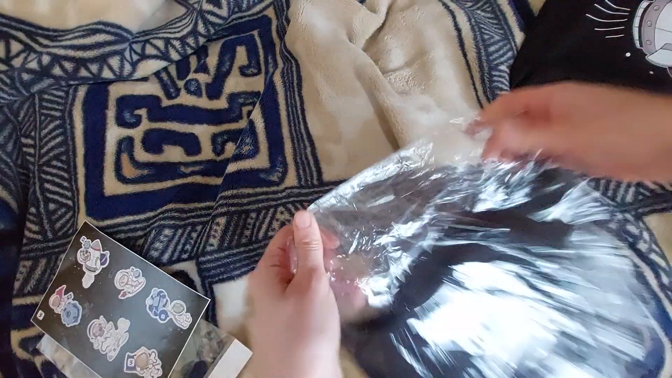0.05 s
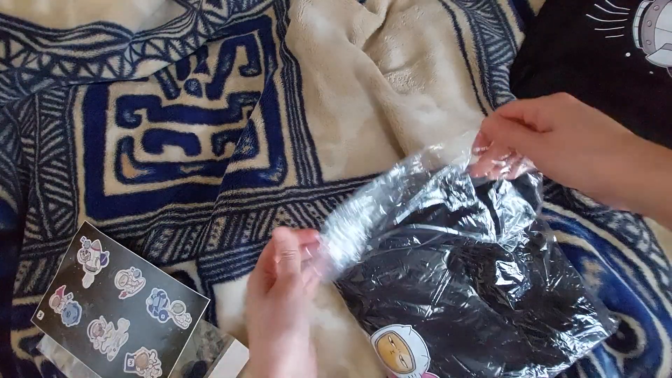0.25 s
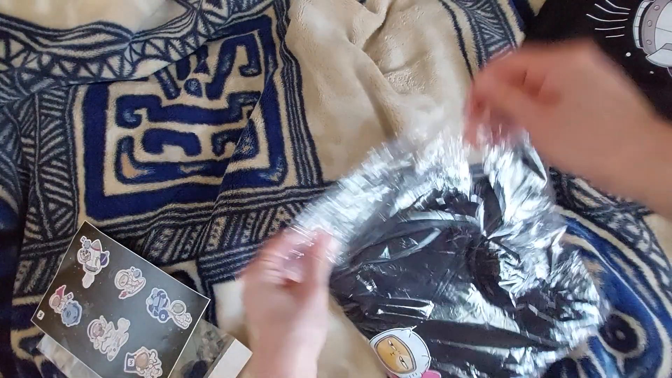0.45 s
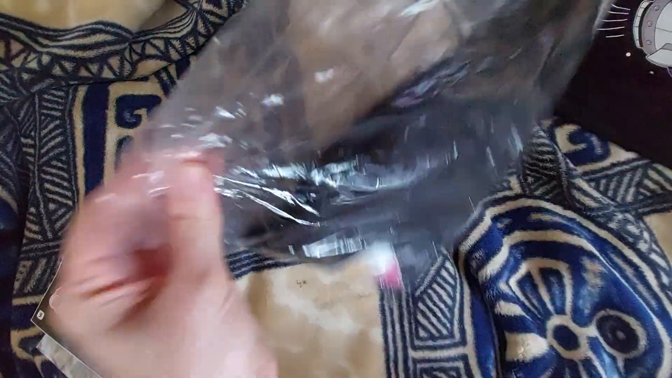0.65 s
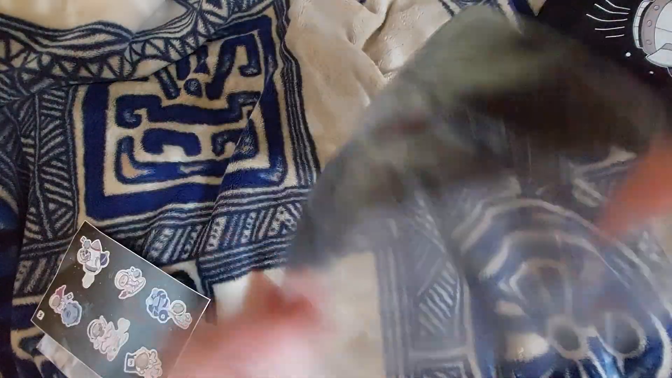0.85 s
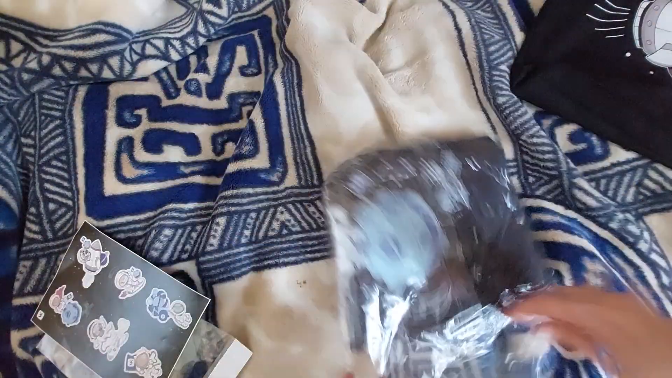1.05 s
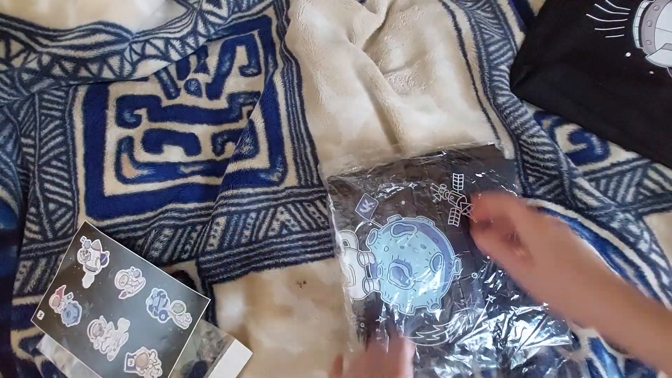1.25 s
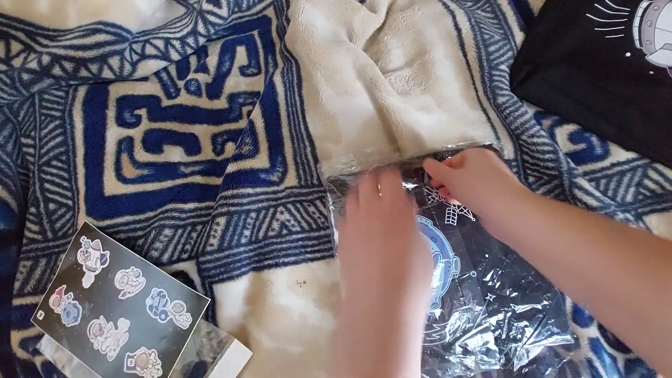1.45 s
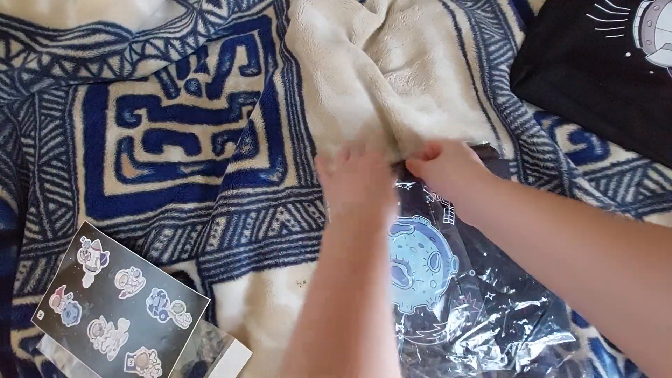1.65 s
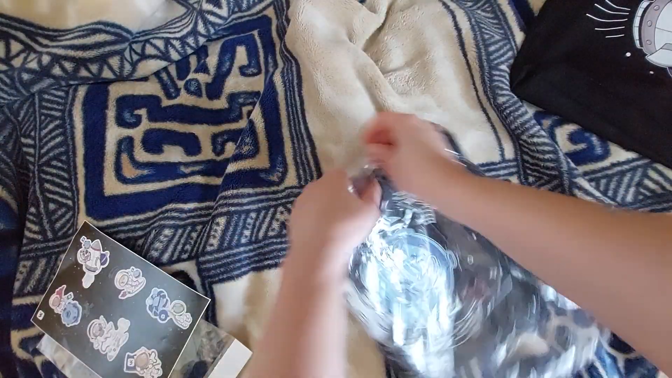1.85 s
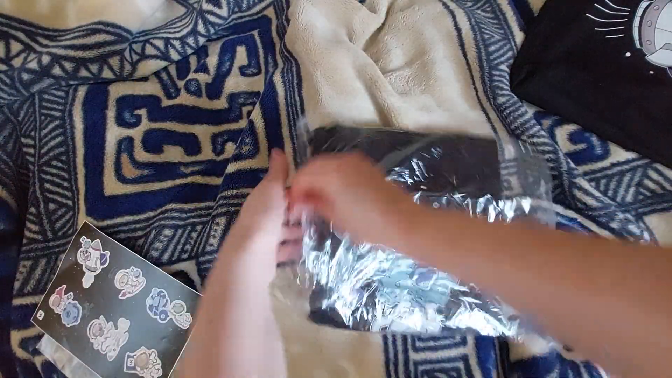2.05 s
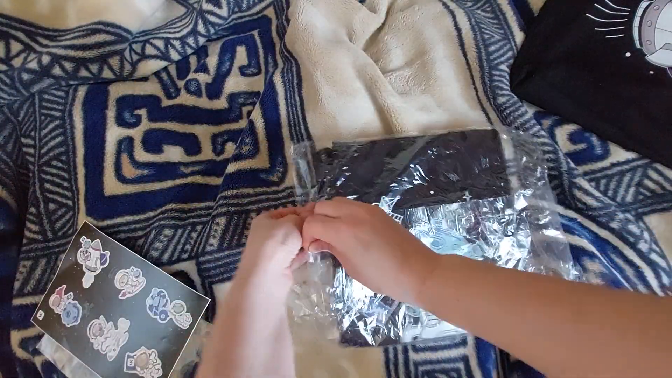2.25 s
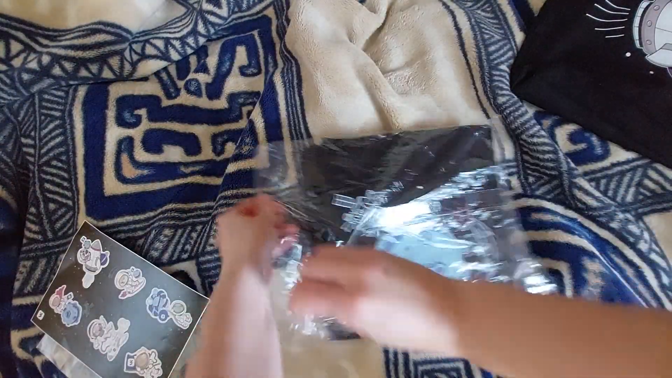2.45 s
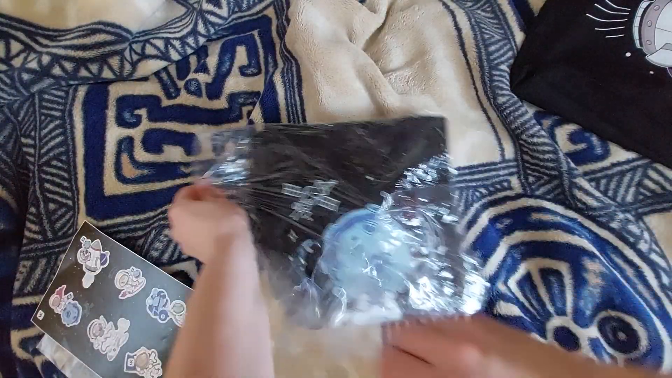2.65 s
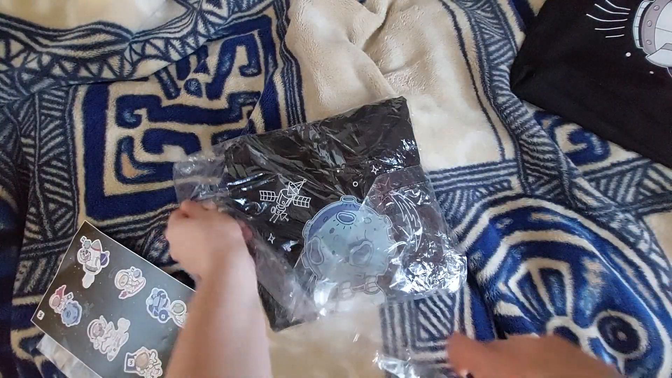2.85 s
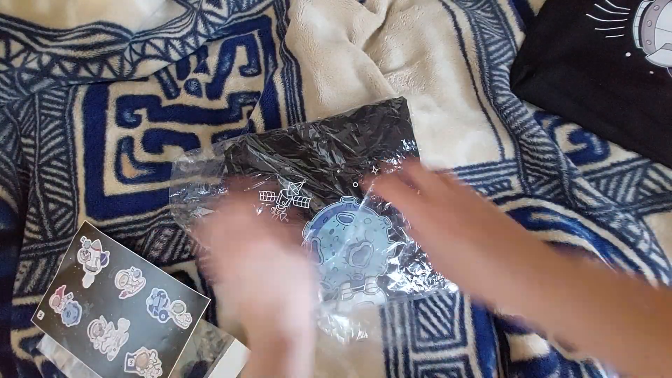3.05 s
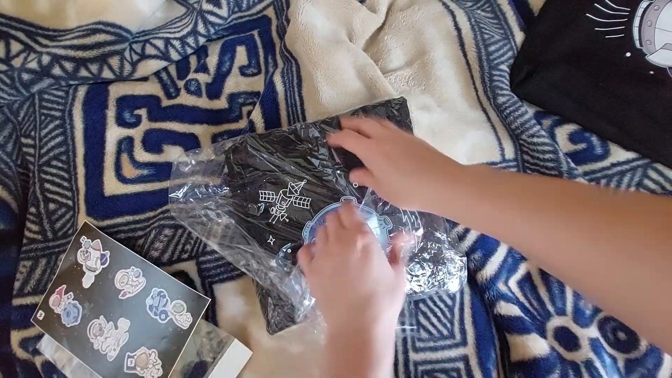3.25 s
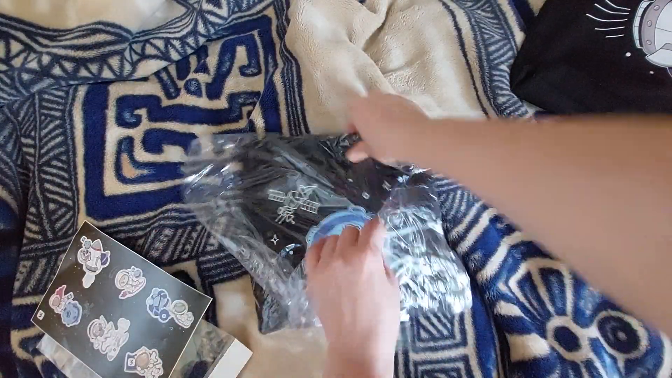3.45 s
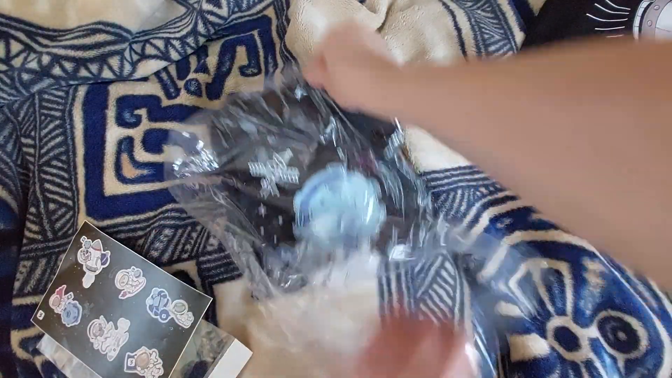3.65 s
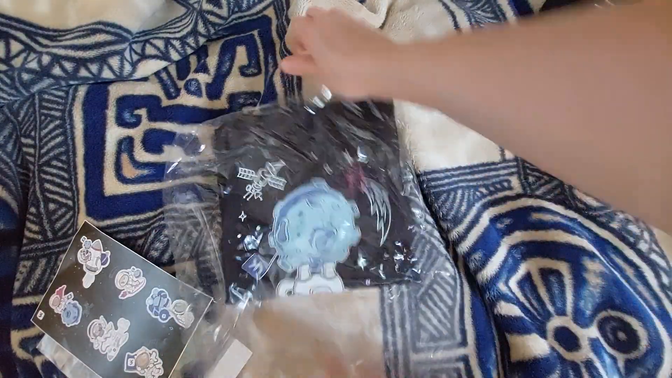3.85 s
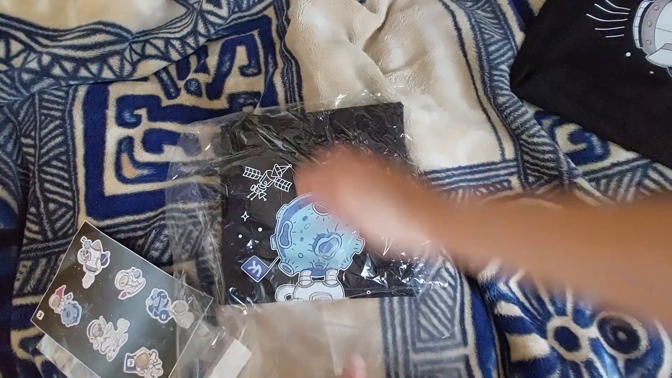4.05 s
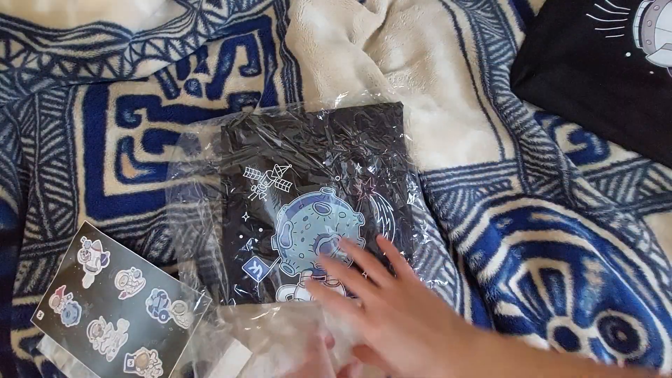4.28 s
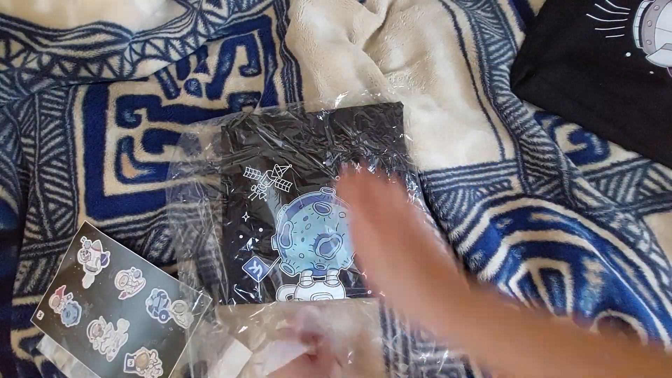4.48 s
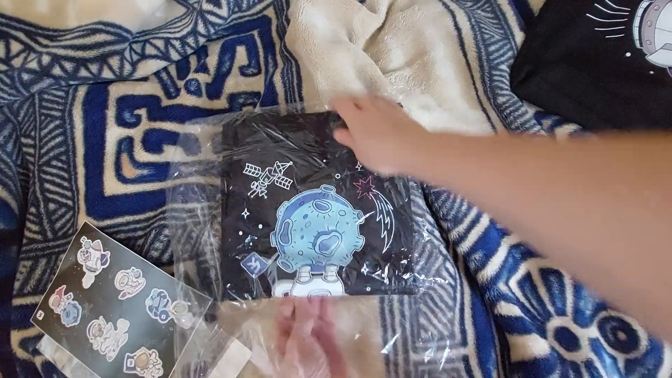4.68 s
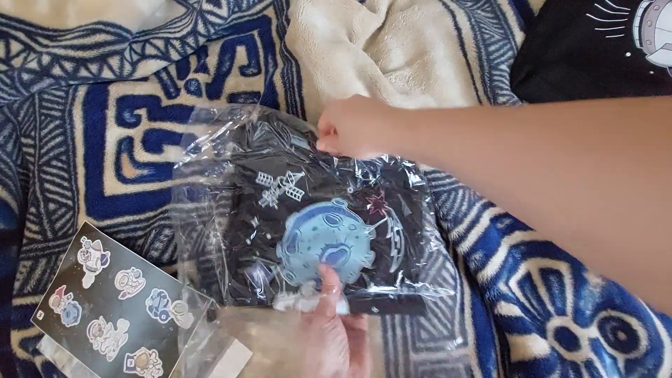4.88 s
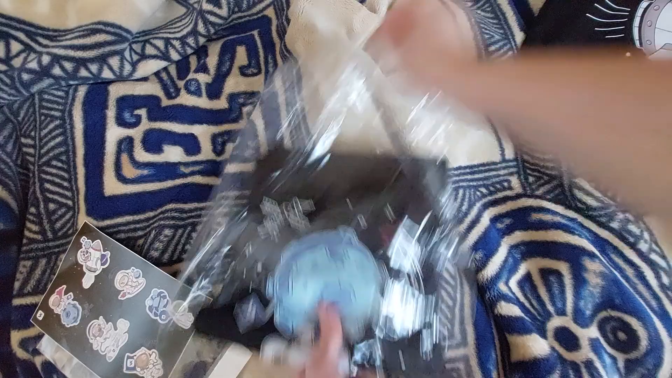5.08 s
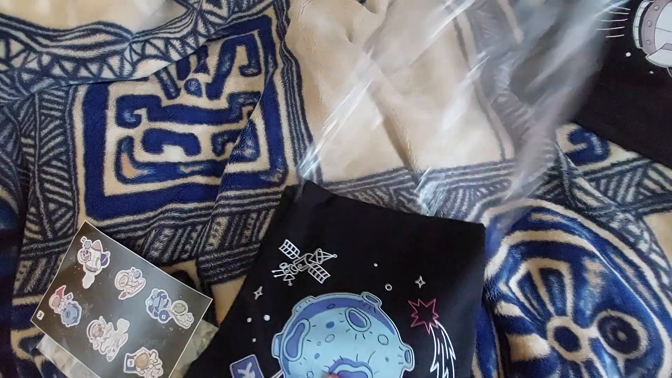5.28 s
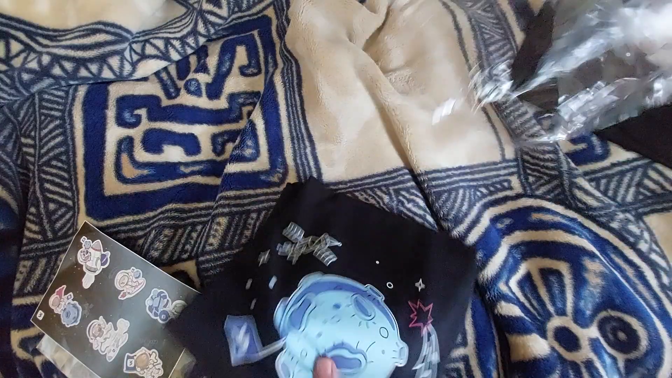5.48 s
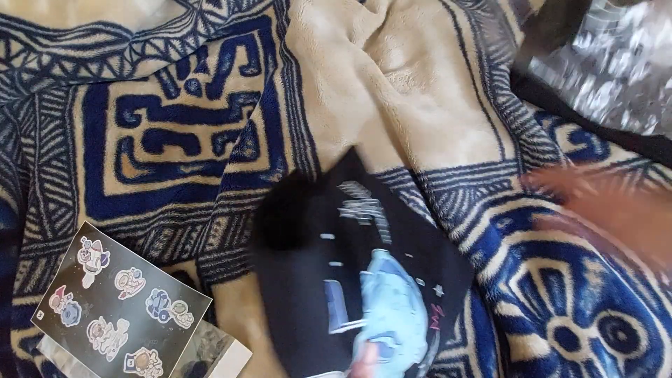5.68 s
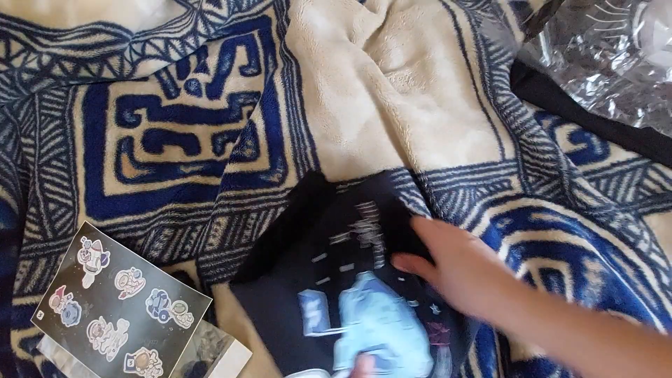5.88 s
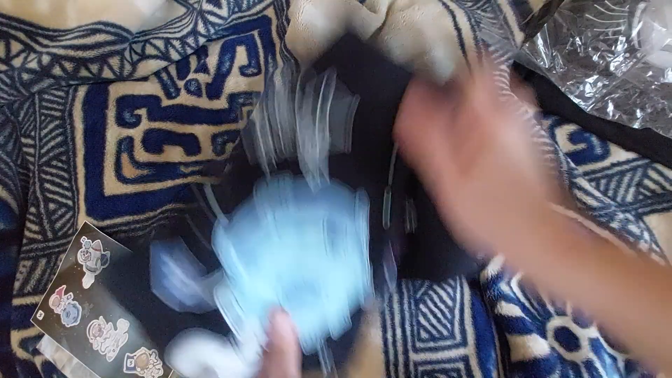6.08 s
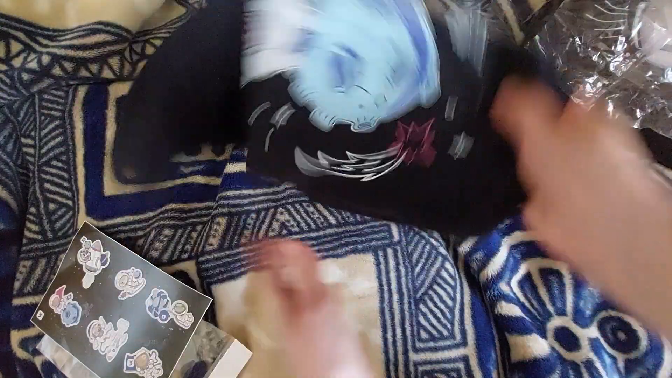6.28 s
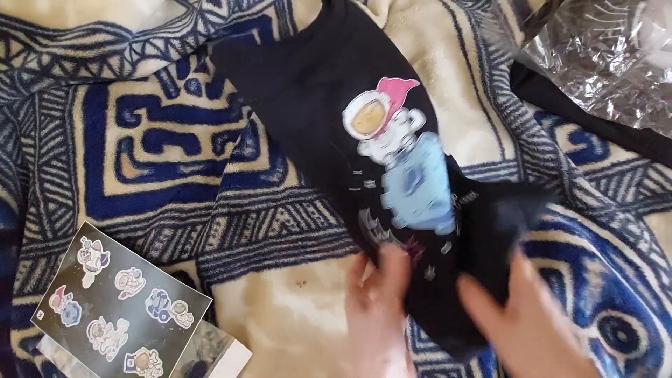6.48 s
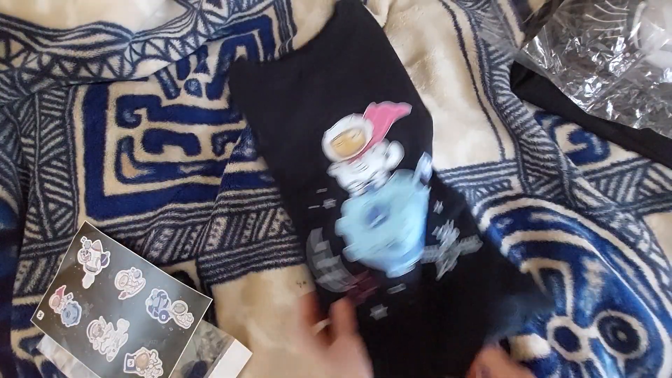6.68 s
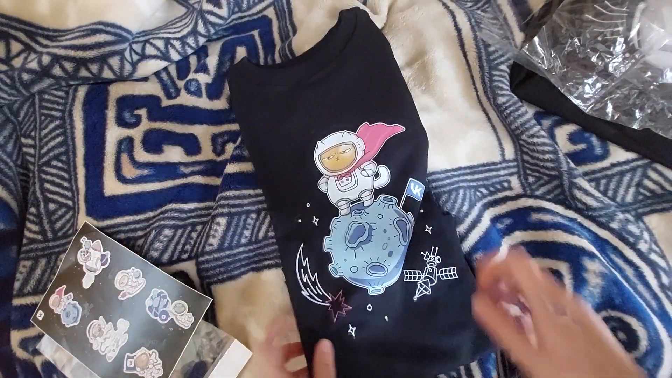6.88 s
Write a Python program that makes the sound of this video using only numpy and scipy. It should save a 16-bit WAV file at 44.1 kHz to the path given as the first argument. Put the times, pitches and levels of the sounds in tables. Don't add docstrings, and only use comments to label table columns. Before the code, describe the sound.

Hands turn, tear open and empty a crinkly plastic bag in a small quiet bedroom, sharp snaps over muffled low bumps.

```python
import sys
import numpy as np
from scipy import signal
from scipy.io import wavfile
from scipy.ndimage import uniform_filter1d

SR = 44100
rng = np.random.default_rng(int(sys.argv[2]) if len(sys.argv) > 2 else 0)


def inscribe(sig):
    pcm = np.round(np.clip(np.atleast_2d(sig).T, -1, 1) * 32767)
    wavfile.write(sys.argv[1], SR, pcm.astype(np.int16))


def natural_amplitude(level_db):
    exponent = np.asarray(level_db, float) / 20
    return 10 ** exponent


N = 305613
TIME = np.arange(N) / SR
LEFT_LAG_S = .00017
SNAP_LATE_S = .0008


def evened(x):
    return x / np.sqrt(np.mean(x ** 2) + 1e-20)


def steadied(x, s):
    power = abs(uniform_filter1d((x ** 2).mean(0), round(s * SR)))
    return x / np.sqrt(power + 1e-12)


def read(points, hz):
    f, value = np.transpose(points)
    return np.interp(np.log(hz + 1), np.log(f + 1), value)


def colour(x, points):
    hz = abs(np.fft.fftfreq(4096, 1 / SR))
    log_gain = np.log(natural_amplitude(np.maximum(read(points, hz), -80)))
    taps = np.fft.ifft(np.exp(signal.hilbert(log_gain).conj())).real[:2048]
    return signal.oaconvolve(x, taps[None], axes=1)[:, :N]


def resonate(x, hz, width):
    r = np.exp(-np.pi * width / SR)
    turn = 2 * np.pi * min(hz, 16000) / SR
    return signal.lfilter([1 - r, 0, r - 1], [1, -2 * r * np.cos(turn), r * r], x)


def treble(x):
    return signal.sosfilt(signal.butter(2, 9000, "high", fs=SR, output="sos"), x)


def panned(x, pan_db):
    return x * natural_amplitude(np.array([pan_db / 2, -pan_db / 2]).reshape(2, -1))


def swells(rows, shift_db=0):
    s, db, rise_s, fall_s = np.array(rows).T[:4, :, None]
    since = TIME[::64] - s
    drop_db = 20 * np.maximum(-since / abs(rise_s), since / abs(fall_s))
    level_db = db + np.reshape(shift_db, (-1, 1)) - drop_db
    return np.interp(TIME, TIME[::64], np.sqrt((natural_amplitude(level_db) ** 2).sum(0)))


# f/Hz, level per Hz/dB
HUM = [(18, -50.5), (30, -19), (53, -0.5), (124, -9.5), (189, -18.5), (295, -2.5), (649, -36), (844, -33.5),
       (2170, -38), (16000, -33)]


def hum():
    noise = .8 * rng.standard_normal(N) + rng.standard_normal((2, N))
    return natural_amplitude(-70) * evened(colour(noise, HUM))


# f/Hz, time to fall 60 dB/s
ROOM = [(250, 0.099), (1500, 0.17), (5000, 0.092), (13000, 0.017)]


def room(x):
    length = SR // 4
    echoes = np.zeros((2, length))
    at = np.arange(130, length - 20, 20) + rng.integers(0, 20, (2, (length - 131) // 20))
    np.put_along_axis(echoes, at, rng.choice([-1., 1.], at.shape), 1)
    hz, t, bands = signal.stft(echoes, SR, nperseg=128)
    t60 = np.maximum(read(ROOM, hz), .01)[:, None]
    tail = signal.istft(bands * natural_amplitude(-60 * t / t60), SR, nperseg=128)[1]
    return signal.fftconvolve(x, tail / np.linalg.norm(tail[0]), axes=1)[:, :N]


# t/s of the peak, crackle level/dB, rise/s per 20 dB, fall/s per 20 dB, pumped air over crackle/dB
HAND_STROKES = [(0.037, -32.0, 0.734, 0.08, -8), (0.156, -22.0, 0.081, 0.221, -11),
                (0.393, -39.5, 0.047, 0.024, -6), (0.491, -32.5, 0.13, 0.095, -9),
                (0.561, -30.0, 0.106, 0.048, -10), (0.614, -30.5, 0.097, 0.037, -12),
                (0.817, -30.5, 0.214, 0.284, -10), (1.119, -28.0, 0.434, 0.144, -9),
                (1.329, -47.5, 1.2, 0.015, -14), (1.409, -48.5, 0.05, 1.199, -10),
                (1.54, -45.5, 0.155, 0.023, -11), (1.579, -38.0, 0.015, 0.381, -16),
                (1.719, -36.0, 0.056, 0.59, -9), (1.893, -30.5, 0.124, 0.249, -13),
                (2.072, -33.5, 0.073, 0.167, -10), (2.16, -37.0, 0.45, 0.429, -9),
                (2.287, -24.0, 0.053, 0.015, -22), (2.377, -17.0, 0.122, 0.368, -14),
           (2.52, -31.0, 0.016, 0.026, -21), (2.592, -23.5, 0.091, 0.037, -22),
           (2.702, -17.5, 0.311, 0.131, -16), (2.923, -41.0, 1.001, 0.084, -8),
           (3.096, -49.0, 0.349, 0.042, -9), (3.217, -42.5, 0.036, 0.17, -18),
           (3.35, -36.0, 0.094, 0.15, -14), (3.562, -17.5, 0.078, 0.072, -17),
           (3.646, -22.5, 0.207, 0.018, -14), (3.723, -32.5, 0.173, 0.227, -10),
           (3.844, -34.5, 0.058, 0.17, -12), (3.943, -39.0, 0.105, 0.107, -6),
           (4.113, -52.0, 0.026, 0.106, -8), (4.193, -42.5, 0.015, 0.077, -10),
           (4.246, -38.0, 0.044, 0.18, -10), (4.457, -53.5, 0.015, 0.028, -13),
           (4.548, -50.0, 0.066, 0.061, -7),
                (4.713, -35.5, 0.064, 0.392, -11), (4.888, -30.0, 0.127, 0.125, -11),
           (5.072, -29.0, 0.194, 0.235, -9), (5.191, -26.5, 0.246, 0.192, -9),
           (5.34, -30.5, 0.317, 0.075, -11), (5.49, -35.5, 0.055, 0.174, -11),
           (5.668, -45.0, 0.03, 0.081, -15), (5.805, -42.0, 0.064, 0.096, -16),
           (5.932, -60.5, 0.362, 0.118, -3), (6.023, -61.0, 0.015, 0.077, -16),
           (6.172, -49.5, 0.077, 0.056, -9), (6.297, -77.5, 0.045, 0.036, 17),
           (6.544, -68.0, 0.181, 0.055, 10), (6.68, -64.0, 1.2, 0.265, -7)]
STROKES = HAND_STROKES


def pumped():
    return swells(STROKES, [row[4] for row in STROKES])


# t/s of the peak, level/dB, rise/s per 20 dB, fall/s per 20 dB
THUMPS = [(0.151, -41.5, 0.127, 0.157), (0.295, -51.5, 0.055, 0.256), (0.533, -43.0, 0.121, 0.131),
          (0.716, -48.5, 0.055, 0.155), (0.822, -46.5, 0.092, 0.352), (1.103, -40.5, 0.042, 0.082),
          (1.299, -65.0, 0.096, 0.472), (1.691, -60.5, 0.137, 0.652), (1.893, -55.5, 0.061, 0.707),
          (2.453, -40.5, 0.143, 0.276), (2.833, -53.5, 0.9, 0.2), (3.529, -49.0, 0.03, 0.319),
          (3.649, -47.5, 0.094, 0.193), (3.959, -52.5, 0.489, 0.108), (4.244, -57.5, 0.104, 0.239),
          (5.196, -45.5, 0.331, 0.256), (5.463, -54.0, 0.033, 0.209), (5.718, -66.0, 0.193, 0.129),
          (5.875, -58.5, 0.115, 0.074), (6.161, -52.5, 0.076, 0.047), (6.311, -62.0, 0.657, 0.05),
          (6.504, -48.0, 0.101, 0.097)]
# f/Hz, level per Hz/dB
RUMBLE = [(12, -44), (20, -24), (70, 0), (150, -2), (178, -14), (200, -2), (260, -27.5), (440, -120)]


def rumble():
    noise = rng.standard_normal(N) + 0.67 * rng.standard_normal((2, N))
    lumps = natural_amplitude(3.6 * evened(uniform_filter1d(rng.standard_normal(N), 1500)))
    low = steadied(colour(noise * lumps, RUMBLE), 0.11)
    level = np.hypot(swells(THUMPS), natural_amplitude(-14) * pumped())
    return panned(natural_amplitude(-1.35) * level * low, -3)


# f/Hz, width/Hz, level/dB
POCKET = [(285, 168, 7), (383, 332, 5), (710, 270, -2.5)]


def pocket(train, level):
    push = evened(train * rng.choice([-1, 1], N)) + 0.47 * rng.standard_normal(N)
    push = push + 0.29 * rng.standard_normal((2, N))
    push[0] = np.roll(push[0], round(LEFT_LAG_S * SR))
    air = np.zeros((2, N))
    for hz, width, db in POCKET:
        wide = width * 1.97
        air += natural_amplitude(db) * resonate(resonate(push, hz, wide), hz, wide)
    jolts = (uniform_filter1d(level, 300) / uniform_filter1d(level, 3000)) ** 0.45
    return natural_amplitude(-0.02) * pumped() * jolts * steadied(air, 0.056)


# t/s, left-right balance/dB, treble of the tight film/dB, body from cloth/dB
PLACE = [(0.0, -5, 0, 0), (0.3, -5, 0, -5), (0.6, -5.5, 2.5, -2), (1.3, -4, 0.5, -2), (2.1, -3.5, -1.5, 0),
         (2.3, -2, -1, -2), (2.43, -2, 2, 0), (2.72, -4, 4, 1), (3.0, 3, -7, 2), (3.5, -3.5, 1, -2),
         (4.1, -1.5, -1.5, 0), (4.6, -2.5, 2.5, 3), (5.3, -2, -1, 2), (5.5, -3.5, -5, -6),
         (5.8, -5.5, -4, -5), (6.1, -6, 2, -2), (6.5, -6, -3, -3), (6.93, -1, -1.5, 4)]


def follow(column):
    rows = np.array(PLACE)
    return np.interp(TIME, rows[:, 0], rows[:, column])


def bodied(x):
    body = signal.sosfilt(signal.butter(1, [550, 1500], "band", fs=SR, output="sos"), x)
    return x + (natural_amplitude(follow(column=3)) - 1) * body


def placed(x):
    lag_s_per_db = .00006
    late = np.round((-follow(column=1) * lag_s_per_db - LEFT_LAG_S) * SR).astype(int)
    left = x[0, np.clip(np.arange(N) - late, 0, N - 1)]
    return np.array([left, x[1]])


def crease(hz, ring_db, lag_s, crack_s, shiver_s, shiver_db, same):
    t = np.arange(900) / SR
    noise = rng.standard_normal((3, len(t)))
    same = np.clip(same, 0, 1)
    noise = same * noise[0] + np.sqrt(1 - same ** 2) * noise[1:]
    fade = np.exp(-t / crack_s) + natural_amplitude(shiver_db) * np.exp(-t / shiver_s)
    burst = noise * fade * (1 - np.exp(-t / .00008))
    burst = evened(burst) + natural_amplitude(ring_db) * evened(resonate(burst, hz, 0.11 * hz))
    late = max(round(lag_s * SR), 0)
    burst[0] = np.concatenate([np.zeros(late), burst[0, :len(t) - late]])
    return burst


def slips(per_s, spread_db, clump_db):
    clumps = evened(uniform_filter1d(rng.standard_normal(N), 500))
    size_db = spread_db * np.minimum(rng.exponential(1, N), 5) + clump_db * clumps
    return natural_amplitude(size_db) * (rng.random(N) < per_s / SR)


# f/Hz, level per Hz/dB
FILM = [(400, -25.5), (900, -7), (1300, -5), (1700, -2.5), (2600, -1), (4300, 0), (8800, -2.5),
        (12500, -0.5), (16500, -3)]


def crackle(train, level, count=24):
    patch = rng.integers(0, count, N)
    out = np.zeros((2, N))
    for k, hz in enumerate(np.geomspace(1000, 15000, count)):
        lag_s = LEFT_LAG_S * rng.uniform(.5, 1.5)
        grain = crease(hz, -4.3, lag_s, crack_s=.00028, shiver_s=.0026, shiver_db=-12.5, same=.7)
        grain = grain * natural_amplitude(rng.normal(0, 0.5, (2, 1)))
        out += signal.oaconvolve((train * (patch == k))[None], grain, axes=1)[:, :N]
    out = steadied(colour(out, FILM), 0.017)
    film = out + (natural_amplitude(follow(column=2)) - 1) * treble(out)
    return level * steadied(film, 0.032)


# t/s, peak level/dB, panel pitch f/Hz, run of slips after it relative to the snap/dB
CREASE_SNAPS = [(0.012, -19.5, 7560, -9), (0.0308, -18, 2600, -12), (0.1664, -16, 2690, -14),
                (0.1883, -10.5, 4140, -17.5), (0.2867, -17.5, 7300, -17), (0.3154, -19, 12200, -14),
                (0.3564, -24.5, 12500, -14), (0.609, -7.5, 14000, -27.5), (0.6462, -22, 7260, -17),
                (0.7418, -19, 4840, -11), (0.817, -19, 12400, -14), (0.8555, -20, 6630, -10),
                (0.913, -21, 4100, -10), (0.9484, -18.5, 7100, -10.5), (0.9852, -20.5, 5280, -11),
                (1.0162, -19.5, 7750, -14), (1.047, -20.5, 10700, -14), (1.1334, -15.5, 4120, -13.5),
                (1.2431, -27, 7460, -10), (1.4584, -30.5, 7670, -15), (1.5783, -22, 7600, -27),
                (1.658, -24, 3950, -15.5), (1.774, -20, 4680, -15), (1.8396, -19, 12900, -16),
                (1.905, -10.5, 13800, -17), (2.0814, -20.5, 4790, -12), (2.153, -18, 12300, -13),
                (2.255, -16, 1330, -13), (2.281, -12, 13800, -11), (2.288, -14, 11400, -10),
              (2.316, -13, 13800, -9), (2.325, -6.5, 10400, -12), (2.335, -14, 1720, -9.5),
              (2.353, -11, 902, -11), (2.357, -1, 1390, -12.5), (2.374, -6.5, 12100, -13),
              (2.38, -6, 4280, -7.5), (2.393, -6, 14400, -12.5), (2.405, -6, 3320, -10),
              (2.415, -6.5, 4340, -10.5), (2.441, -9, 5450, -10.5), (2.454, -5.5, 6760, -9.5),
              (2.464, -8.5, 1590, -10), (2.473, -8.5, 1220, -11), (2.497, -10, 1780, -9.5),
              (2.51, -5, 1700, -11.5), (2.59, -8, 6160, -11), (2.749, -12, 7360, -11.5),
              (2.924, -28, 2790, -10),
                (3.0799, -32.5, 4140, -16), (3.2226, -27, 3110, -15), (3.2363, -27.5, 11800, -14.5),
              (3.35, -15.5, 6540, -16), (3.4986, -9.5, 13100, -21.5), (3.5314, -7, 7150, -9),
              (3.5376, -12, 4400, -15), (3.5572, -6, 5400, -16), (3.5934, -10, 4340, -16),
              (3.6062, -17, 3450, -16), (3.6264, -8.5, 7190, -16), (3.6387, -7, 4160, -20),
              (3.688, -23.5, 7530, -9), (3.8145, -22.5, 5070, -11), (3.8425, -19, 12500, -16),
              (3.948, -18.5, 4250, -15), (4.0052, -28, 3730, -17), (4.058, -38, 7310, -17),
              (4.0921, -42, 4900, -16), (4.114, -30.5, 2190, -17.5), (4.196, -27.5, 5030, -20),
              (4.237, -21, 4900, -17), (4.318, -28.5, 5330, -11), (4.4523, -27.5, 7540, -15),
              (4.5231, -35.5, 2040, -18), (4.5506, -35, 3430, -16),
                (4.6608, -30.5, 13600, -14.5), (4.688, -29.5, 5070, -14.5), (4.694, -25, 12100, -14.5),
              (4.7152, -22.5, 12800, -14.5), (4.7215, -24, 12700, -14.5), (4.7466, -22, 5780, -14.5),
              (4.7734, -23, 11900, -14.5), (4.8214, -16, 7440, -14.5), (4.8813, -12, 8640, -14.5),
              (4.9326, -18, 5000, -14.5), (4.9412, -14, 12100, -14.5), (5.005, -16, 4740, -14.5),
              (5.1213, -16.5, 4460, -14.5), (5.1884, -13.5, 4640, -14.5), (5.2826, -15.5, 8880, -14.5),
              (5.37, -21.5, 11200, -14.5), (5.4475, -31, 7710, -14.5), (5.4654, -26, 4760, -14.5),
              (5.5525, -26, 4810, -14.5), (5.656, -36.5, 5540, -14.5), (5.7903, -31.5, 11600, -14.5),
              (5.9406, -42, 5900, -14.5), (6.0232, -37, 7400, -14.5)]
CREASES = CREASE_SNAPS


def snaps():
    out = np.zeros((2, N + 900))
    for s, db, hz, _ in CREASES:
        crack = crease(hz, -10, LEFT_LAG_S, crack_s=.00025, shiver_s=.0018, shiver_db=-16, same=.8)
        pop = resonate(crack, 730, 1100)
        crack = signal.lfilter(*signal.butter(2, min(5500, .55 * hz), "high", fs=SR), crack)
        pop_gain = natural_amplitude(-6 - 4.5 * np.log2(hz / 1300))
        sound = crack / abs(crack).max() + pop_gain * pop / abs(pop).max()
        at = round((s + SNAP_LATE_S) * SR)
        out[:, at:at + 900] += natural_amplitude(db + 3) * sound
    return out[:, :N]


def effort():
    level = natural_amplitude(-1.0) * swells(STROKES)
    run_s, hush_s, hush_db = .0078, .007, -3.5
    t = np.arange(round((run_s + .01) * SR)) / SR
    run = natural_amplitude(-1.8 * t / run_s - 60 * np.maximum(t - run_s, 0) / .012)
    hush = natural_amplitude(hush_db * np.sqrt(np.linspace(0, 1, round(hush_s * SR))))
    starts = [round((row[0] + SNAP_LATE_S) * SR) for row in CREASES]
    for at in starts:
        level[at - len(hush):at] *= hush
    for at, (_, db, _, run_db) in zip(starts, CREASES):
        part = level[at:][:len(t)]
        part[:] = np.maximum(part, natural_amplitude(db + run_db) * run)
    return level + 1e-6


def scene():
    train = slips(per_s=2500, spread_db=2.8, clump_db=3.0)
    level = effort()
    film = panned(crackle(train, level) + snaps(), follow(column=1))
    air = panned(pocket(train, level), -0.89)
    bag = placed(bodied(film + air))
    return hum() + natural_amplitude(-14.0) * room(bag) + rumble() + bag


def low_pass(x):
    return signal.sosfilt(signal.butter(12, 17010, fs=SR, output="sos"), x)


def record(dry):
    band = signal.firwin(255, 16000, window=("kaiser", 9), fs=SR)
    heard = signal.oaconvolve(dry, band[None], "same")
    heard = heard + treble(heard) * [[.25], [-.25]]
    mix = np.tanh(1.237 * heard) / 1.162
    return low_pass(mix)


dry = scene()
out = record(dry)
inscribe(out)
```